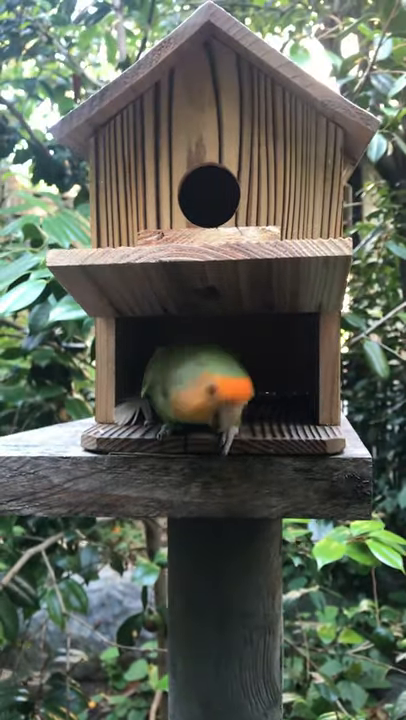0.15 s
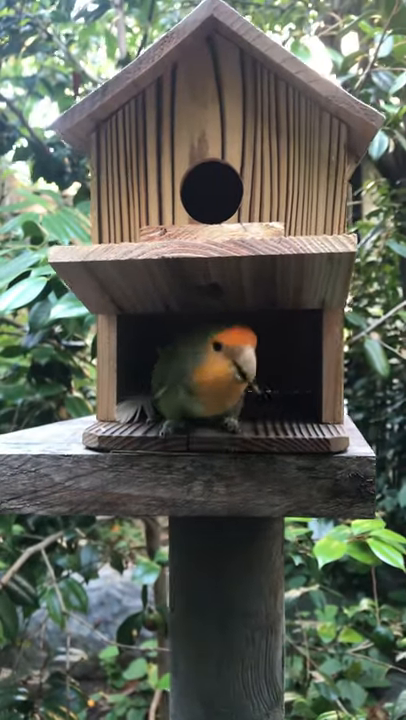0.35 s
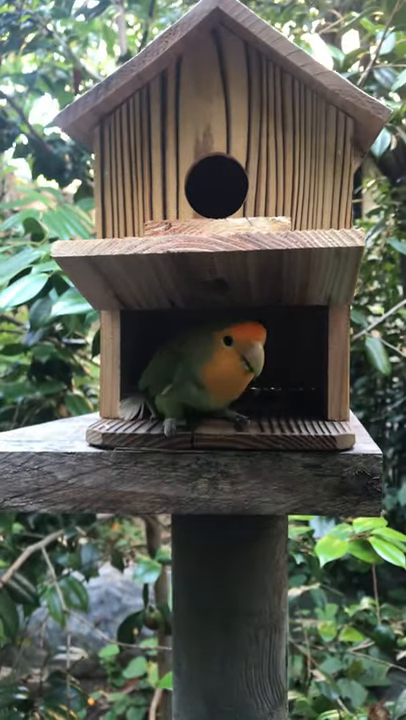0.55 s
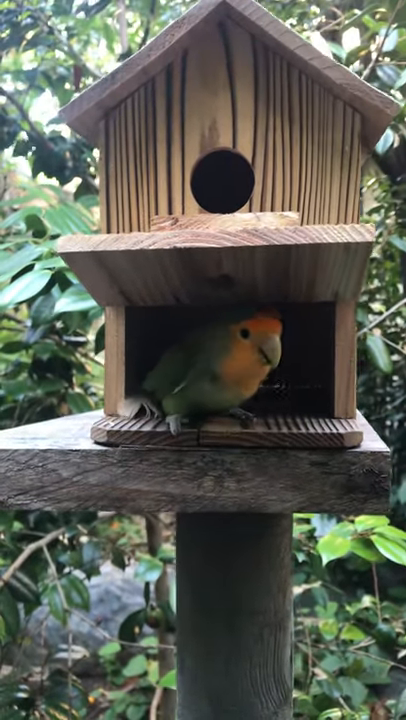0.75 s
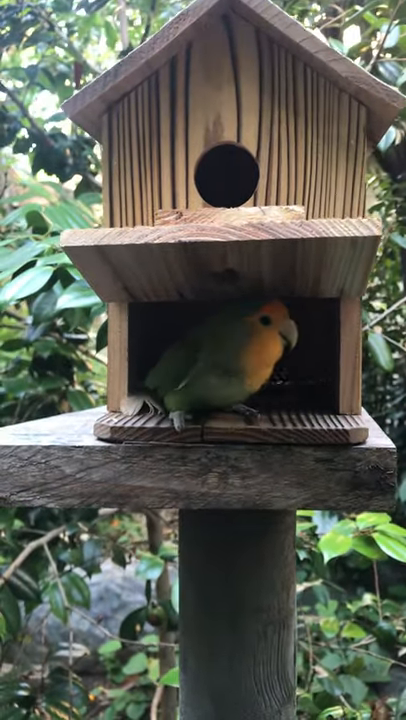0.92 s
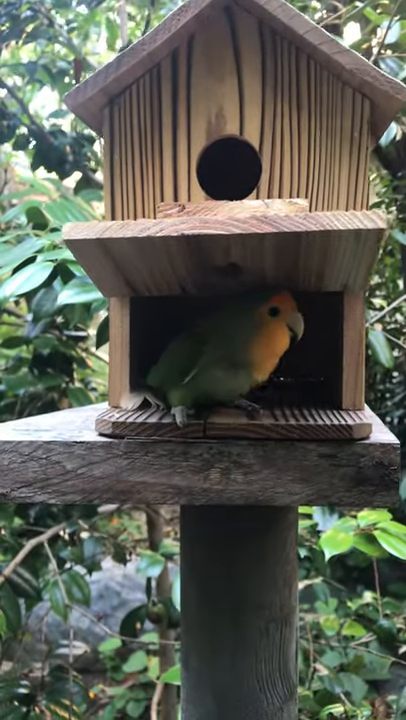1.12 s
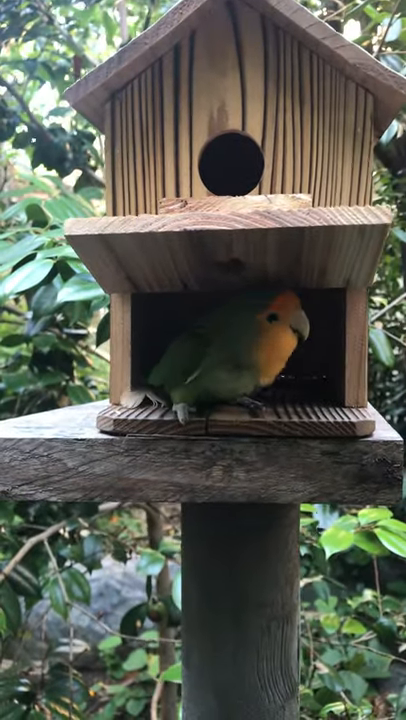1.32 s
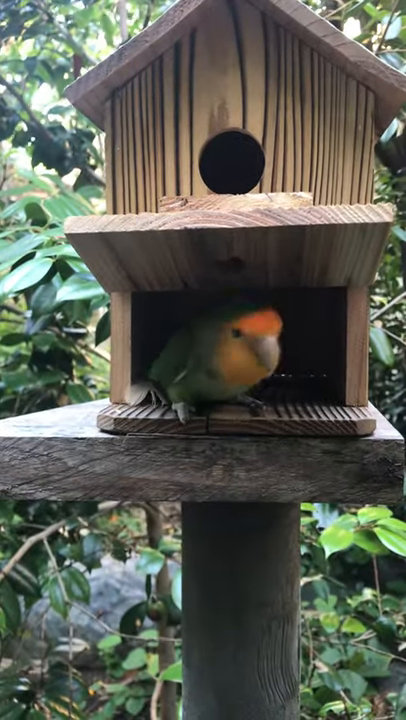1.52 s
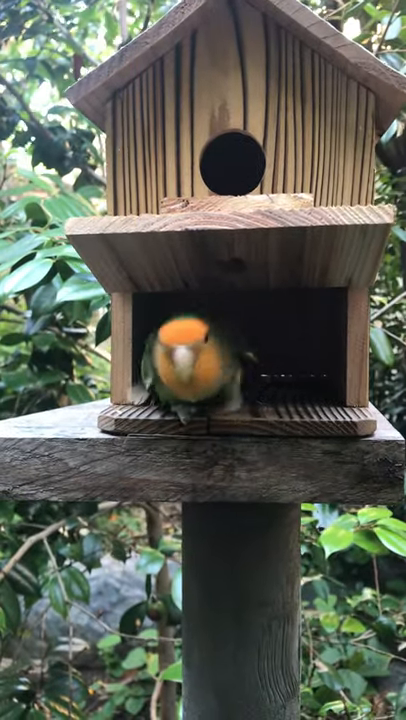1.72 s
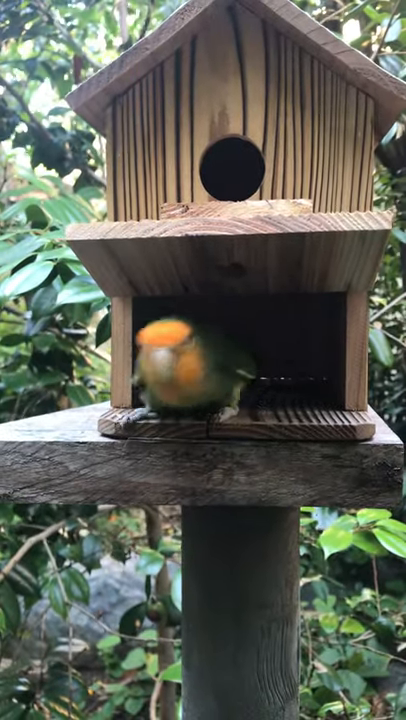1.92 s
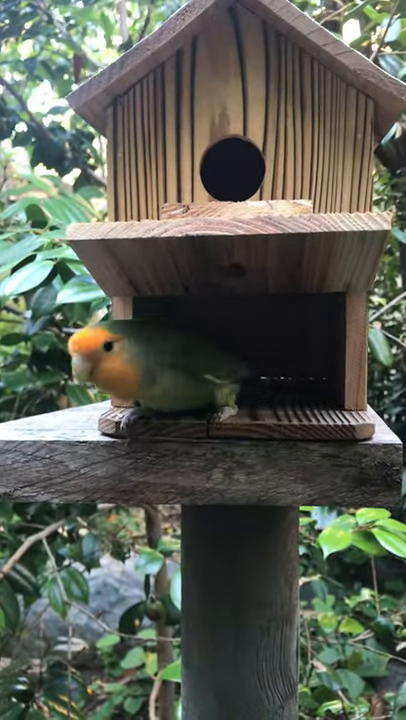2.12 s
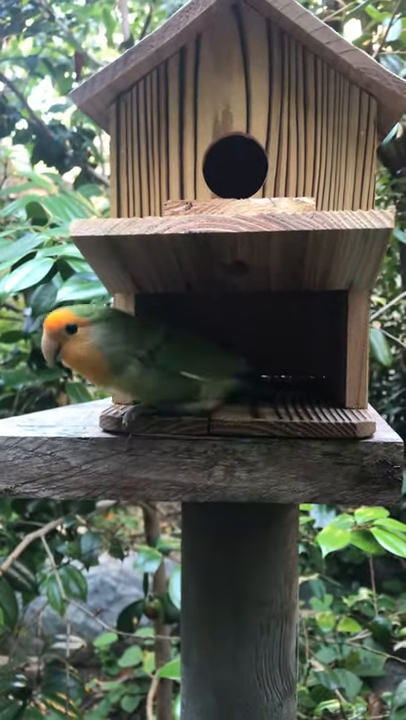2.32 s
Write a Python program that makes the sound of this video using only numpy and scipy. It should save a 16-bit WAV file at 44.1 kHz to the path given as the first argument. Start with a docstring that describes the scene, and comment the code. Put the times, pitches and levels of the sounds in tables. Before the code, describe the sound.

A small parrot close by gives one loud, sharp two-part chirp in a quiet garden

```python
"""A lovebird on a wooden nest box, close by, gives a two-part chirp that jumps between three registers:
a sum of harmonics shaped by a throat response, with a flutter in pitch and level.
The garden echoes it as decaying noise tails; a foot, beak and claws excite damped modes.
Far off, other birds whistle (arched glides) and buzz (random fast sweeps).
Filtered noise gives traffic rumble and insect hiss; a gain control ducks the sound during and after the call."""
import sys
import numpy as np
from scipy import signal
from scipy.fft import rfft, irfft
from scipy.io import wavfile
from scipy.ndimage import uniform_filter1d, minimum_filter1d

SR = 44100
rng = np.random.default_rng(int(sys.argv[2]) if len(sys.argv) > 2 else 0)


def master_out(mix):
    """Clip the mix to full scale and print it as 16-bit PCM to the path in sys.argv[1]."""
    frames = np.transpose(np.atleast_2d(mix))
    ceiling = np.clip(frames, -1, 1)
    pcm = np.round(ceiling * 32767).astype(np.int16)
    wavfile.write(sys.argv[1], SR, pcm)


N = 103635
T = np.arange(N) / SR
NYQUIST_GUARD_HZ = .45 * SR


def undb(db):
    """Level in dB to amplitude ratio."""
    return 10 ** (np.asarray(db) / 20)


def level(x, db):
    """Scales a signal to a given RMS level in dB."""
    return x * undb(db) / np.sqrt(np.mean(x ** 2))


def on_log(hz, table):
    """Interpolates a (f/Hz, level/dB) response along a logarithmic frequency axis."""
    f, db = np.array(table).T
    return np.interp(np.log(np.maximum(hz, 1)), np.log(f), db)


def walk(rate_hz):
    """Smooth random wander of unit RMS: white noise averaged twice over 1 / rate_hz."""
    k = max(int(SR / rate_hz), 1)
    smooth = uniform_filter1d(uniform_filter1d(rng.standard_normal(N), k), k)
    return level(smooth, 0)


def band(x, lo_hz, hi_hz):
    """Band-pass filtering by a Butterworth response."""
    edges = [lo_hz, min(hi_hz, NYQUIST_GUARD_HZ)]
    return signal.sosfilt(signal.butter(2, edges, "band", fs=SR, output="sos"), x)


def noise_band(lo_hz, hi_hz):
    """Band-limited Gaussian noise."""
    return band(rng.standard_normal(N), lo_hz, hi_hz)


def sine(hz):
    """A sinusoid whose phase is the running integral of its frequency."""
    return np.sin(2 * np.pi * np.cumsum(hz) / SR)


def echo(x, t60_s, wet_db, dull_hz):
    """Diffuse reflection from leaves and walls: convolution with a decaying noise tail of unit energy."""
    t = T[:SR]
    onset = np.clip(t / .004, 0, 1)
    tail = band(rng.standard_normal(SR), 200, dull_hz) * 1000. ** (-t / t60_s) * onset
    tail = tail / np.sqrt(np.sum(tail ** 2))
    return undb(wet_db) * signal.fftconvolve(x, tail)[:N]


def strike(events, modes):
    """Modal superposition: each impact rings the same damped modes, slightly detuned."""
    out = np.zeros(N)
    detune = 1 + .038 * rng.standard_normal((len(events), len(modes)))
    for (start, db), ratios in zip(events, detune):
        t = np.maximum(T - start, 0)
        for (hz, mode_db, t60_s), ratio in zip(modes, ratios):
            ring = np.sin(2 * np.pi * hz * ratio * t)
            out += undb(db + mode_db) * ring * 1000. ** (-t / t60_s)
    return out


def lovebird():
    """Source-filter voice: throat-weighted harmonics, with a slower membrane modulating pitch and level."""
    # the chirp, one list per stretch in a register:
    # t/s, fundamental f/Hz, level/dB, harmonic fall/(dB per octave), flutter depth (0-1)
    chirp_path = [
        [(.180, 2110, -25, -10.5, 0), (.184, 1830, -14.5, -11, 0.01), (.188, 1537, -15.5, -8, 0.01),
         (.192, 1541, -14, -6.5, 0), (.196, 1790, -15.5, -10, 0.08), (.201, 1722, -12.5, -10, 0.01),
         (.205, 2150, -10.5, -7, 0.08), (.2078, 2661, -17.5, -12.5, 0.01)],
        [(.2085, 3084, -18, -15, 0.05), (.211, 3390, -3.5, -11, 0.01), (.216, 3733, -9, -10, 0),
         (.219, 3804, -4.5, -14.5, 0.1), (.224, 4104, -3, -22.5, 0.13), (.229, 4412, -4.5, -16.5, .06),
         (.2315, 4650, -6, -11.5, .1)],
        [(.2325, 6058, -3, -23.5, .22), (.241, 6150, 2, -20, 0.2), (.249, 5957, -3.5, -16.5, 0.2),
         (.255, 5729, 4.5, -13, 0.2), (.2575, 5514, -14.5, -11.5, .3), (.261, 5073, -10.5, -13, 0.2)],
        [(.2625, 3700, -4, -16.5, 0.02), (.265, 3268, -4.5, -15.5, 0), (.2675, 3400, -10, -15, 0.03),
         (.2685, 3497, -33, -12.5, 0)],
        [(.269, 1904, -22.5, -10.5, 0), (.271, 1836, -9, -11.5, 0.08), (.277, 1680, -14.5, -10, 0),
         (.281, 1689, -23, -16, 0), (.284, 2000, -22, -19.5, 0), (.2868, 2648, -23, -18.5, 0)],
        [(.288, 2920, -21.5, -22, 0.02), (.293, 3038, -11, -22, 0.04), (.301, 3212, -6.5, -22, 0.03),
         (.31, 3348, -5.5, -16.5, 0.08), (.318, 3743, -6.5, -15, 0.1), (.324, 3970, -3.5, -20.5, 0.2),
         (.331, 4480, -7.5, -14.5, 0.31)],
        [(.3335, 5760, -8, -15.5, 0.4), (.337, 5924, -2.5, -19, 0.16), (.343, 6068, -5, -28, 0.3),
         (.35, 5944, -6.5, -34, .07), (.359, 6175, -4, -26.5, 0.11), (.364, 6030, -7, -18, 0.05),
         (.367, 5350, -9.5, -24.5, 0.07), (.3695, 4930, -28.5, -19, 0.08)],
    ]
    # throat response: f/Hz, level/dB
    throat = [(1500, -22.5), (2300, -20), (3400, -1.5), (4700, -2.5), (5800, 2), (7500, -4), (9500, 0),
              (11000, 1.5), (12500, 12), (14000, 0.5), (16500, -16.5)]
    flutter_hz, flutter_wander = 285, .16
    flutter_swing, jitter = .11, .002  # shares of the pitch
    upper_fall_db = -5  # extra fall per harmonic above the fifth
    rasp_db, puff_db = -36.5, -52  # relative to the voice before its level contour
    edge_s = .0008

    s, hz, db, fall_db, flutter = np.vstack(chirp_path).T
    s = np.maximum.accumulate(s + 1e-6 * np.arange(len(s)))
    hz, db, fall_db, flutter = (np.interp(T, s, v) for v in (hz, db, fall_db, flutter))

    beat = np.clip(flutter, 0, 1) * sine(flutter_hz * (1 + flutter_wander * walk(67)))
    hz = hz * (1 + jitter * walk(800) + flutter_swing * beat)
    phase = 2 * np.pi * np.cumsum(hz) / SR

    k = np.arange(1, 11)[:, None]  # harmonic number
    source_db = fall_db * np.log2(k) + upper_fall_db * np.maximum(k - 5, 0)
    gain = undb(source_db + on_log(k * hz, throat)) * (k * hz < NYQUIST_GUARD_HZ)
    # dividing by the summed harmonic power leaves the level to the contour alone
    voice = np.sum(gain * np.sin(k * phase), axis=0) / np.sqrt(np.sum(gain ** 2, axis=0) / 2)

    rasp = level(noise_band(2900, 14000), rasp_db)
    puff = level(noise_band(300, 1500), puff_db)
    edges = np.clip(np.minimum(T - s[0], s[-1] - T) / edge_s, 0, 1)
    return (voice * (1 + beat) + rasp + puff) * undb(db) * edges


def garden_echo(bird):
    """Reverberation as the sum of a short decay and a fainter, longer, duller one."""
    early = echo(bird, t60_s=.11, wet_db=-24, dull_hz=10000)
    late = echo(bird, t60_s=.4, wet_db=-28.5, dull_hz=8000)
    return early + late


def foot_on_wood():
    """Impact excitation of wood: a few low damped modes."""
    # foot taps: t/s, level/dB
    taps = [(.537, -66), (1.929, -53), (1.962, -64)]
    # wood modes: f/Hz, relative level/dB, t60/s
    wood_modes = [(489.3, 8, 0.066), (594, 7, 0.062), (1013.3, 7, 0.058), (1357, -7, .02)]
    return strike(taps, wood_modes)


def beak_and_claw():
    """Impact excitation by hard, light contacts: heavily damped modes up to high frequencies."""
    # ticks: t/s, level/dB
    ticks = [(.106, -68), (.148, -54), (.537, -59), (1.048, -65), (1.928, -69), (1.962, -69),
             (2.325, -69.5)]
    # tick modes: f/Hz, relative level/dB, t60/s
    tick_modes = [(1100, 14.5, 0.0054), (1600, 1, 0.0146), (5830, 10, .006), (6710, 7, 0.0073),
                  (9050, 0.5, .006), (9440, 3, .008), (13000, -6, .005)]
    return strike(ticks, tick_modes)


def far_whistles():
    """Frequency modulation of pure tones: each pitch follows an arch, with a shared random warble."""
    # t/s, length/s, start f/Hz, turning f/Hz, end f/Hz, share of length before the turn, level/dB
    whistles = [(.01, 0.081, 3780, 4510, 4320, 0.52, -61.5), (0.078, 0.1, 3795, 4570, 3550, 0.53, -55.5),
                (.585, 0.021, 3475, 3500, 3400, 0.6, -62), (.68, 0.085, 3700, 4147, 4050, .6, -65.5),
                (.74, 0.074, 3650, 4106, 3407, 0.61, -59.5), (0.961, .07, 3460, 3820, 3750, .6, -68.5),
                (1.018, 0.084, 3400, 3830, 3300, 0.776, -65.5), (1.329, 0.062, 3400, 3500, 3350, .5, -77.5),
                (1.389, .028, 3420, 3520, 3250, .6, -62.5), (1.465, .085, 3790, 4220, 4037, .5, -64),
                (1.542, 0.047, 3826, 4230, 3740, .5, -64.5), (1.601, 0.045, 4100, 4150, 3650, 0.33, -69.5),
                (1.645, 0.038, 3486, 3800, 3500, 0.565, -69.5), (1.7, .075, 3343, 3200, 3400, 0.515, -73),
                (2.16, .05, 4300, 5500, 5350, 0.82, -72), (2.2, .04, 5350, 5196, 3950, .1, -71)]
    out = np.zeros(N)
    warble = 1 + .012 * walk(150)
    for start, length, hz0, hz1, hz2, turn, db in whistles:
        u = np.clip((T - start) / length, 0, 1)  # progress through the note
        before = np.clip(1 - u / max(turn, .05), 0, 1)
        after = np.clip((u - turn) / max(1 - turn, .05), 0, 1)
        hz = hz1 - (hz1 - hz0) * before ** 2 - (hz1 - hz2) * after ** 1.5
        envelope = np.abs(np.sin(np.pi * u)) ** .3 * (u > 0) * (u < 1)
        out += undb(db) * envelope * sine(hz * warble)
    return out * undb(1.6 * walk(90))


def far_buzz():
    """Random frequency modulation: fast bounded sweeps spread one tone into a buzz."""
    # t/s, centre f/Hz, level/dB
    buzz_path = [(1.83, 5010, -85.5), (1.86, 5240, -71), (1.89, 6000, -72), (1.94, 5600, -65),
                 (2.0, 5000, -63), (2.06, 4677, -63.5), (2.13, 4555, -64), (2.17, 4520, -74),
                 (2.19, 4533, -92.5)]
    sweep_rate_hz, sweep_limit_hz = 400, 748
    s, hz, db = np.array(buzz_path).T
    hz = np.interp(T, s, hz) + sweep_limit_hz * np.tanh(walk(sweep_rate_hz))
    return undb(np.interp(T, s, db, -150, -150)) * sine(hz)


def far_birds():
    """Distance as a low direct-to-reverberant ratio: a strong echo blurs whistles and buzz."""
    song = far_whistles() + far_buzz()
    return song + echo(song, t60_s=.3, wet_db=-5, dull_hz=9000)


def air():
    """Spectrally shaped noise: rumble and leaf hiss in overlapping octave bands that flicker separately."""
    # spectral density shape: f/Hz, level/(dB per Hz)
    air_shape = [(25, -6.5), (76, -4.5), (110, -8.5), (181, -12), (265, -13), (468, -21), (946, -24.5),
                 (1500, -29.5), (2580, -34), (3880, -31.5), (5500, -36.5), (7850, -42.5), (12400, -45.5),
                 (16300, -51)]
    air_db, bass_cut_hz = -56.5, 48
    swell_db, flicker_db = -.1, 1.93  # RMS excursions, shared by all bands and separate in each
    f = np.maximum(np.fft.rfftfreq(N, 1 / SR), 1)
    bass_cut = 1 / (1 + (bass_cut_hz / f) ** 4)
    spectrum = rfft(rng.standard_normal(N)) * undb(on_log(f, air_shape)) * bass_cut
    swell = walk(2)
    out = np.zeros(N)
    for octave in range(4, 16):  # centres at 2 ** octave Hz
        share = np.clip(1 - np.abs(np.log2(f) - octave), 0, 1)
        out += irfft(spectrum * share, N) * undb(swell_db * swell + flicker_db * walk(10))
    return level(out, air_db)


def drone():
    """Narrow-band noise: a low drone whose bandwidth sets its slow beating."""
    centre_hz, width_hz = 58, 22
    return level(noise_band(centre_hz - width_hz / 2, centre_hz + width_hz / 2), -56.5)


def insect():
    """Narrow-band noise with random amplitude modulation: a thin, high hiss."""
    centre_hz, width_hz = 12200, 350
    hiss = noise_band(centre_hz - width_hz / 2, centre_hz + width_hz / 2)
    return level(hiss, -84.5) * undb(2.5 * walk(15))


def scene():
    """Linear superposition of all sources in one channel."""
    bird = lovebird()
    near = bird + garden_echo(bird) + foot_on_wood() + beak_and_claw()
    background = far_birds() + air() + drone() + insect()
    return (near + background)[None]


def record(dry):
    """Level-dependent gain with hold, then peak limiting and a steep low-pass filter."""
    duck_above_db, duck_db, duck_hold_s, duck_slew_s = -20, -4, .168, .004
    limit, limit_s = .86, .003
    top_hz = 16380
    hold, span = int(duck_hold_s * SR), int(limit_s * SR)

    quiet = (np.abs(dry[0]) < undb(duck_above_db)) * 1.
    # the shifted window looks back, so the gain stays down for the hold time after a loud sample
    quiet = minimum_filter1d(quiet, size=hold, origin=(hold - 1) // 2)
    duck = 1 - uniform_filter1d(quiet, size=int(duck_slew_s * SR))
    ducked = dry[0] * undb(duck_db * duck)

    peak_gain = limit / np.maximum(np.abs(ducked), limit)
    peak_gain = minimum_filter1d(peak_gain, size=2 * span + 1)
    limited = ducked * uniform_filter1d(uniform_filter1d(peak_gain, size=span), size=span)
    top_cut = signal.ellip(14, .2, 110, top_hz, fs=SR, output="sos")
    return signal.sosfilt(top_cut, limited)[None]


dry = scene()
out = record(dry)
master_out(out)
```